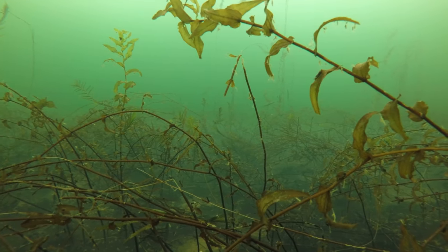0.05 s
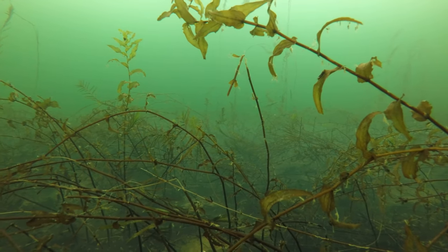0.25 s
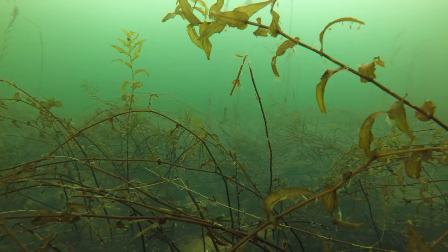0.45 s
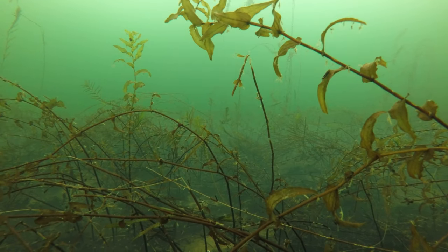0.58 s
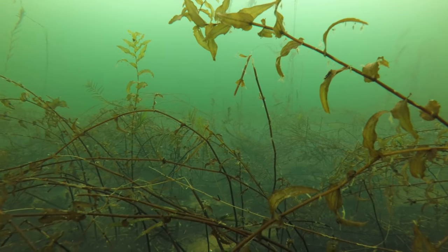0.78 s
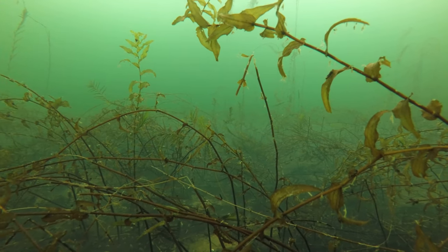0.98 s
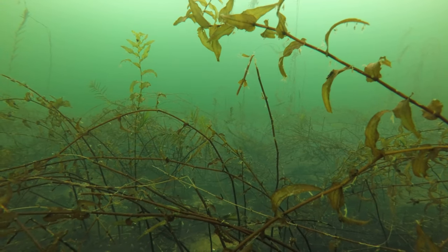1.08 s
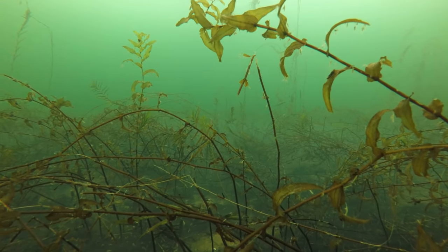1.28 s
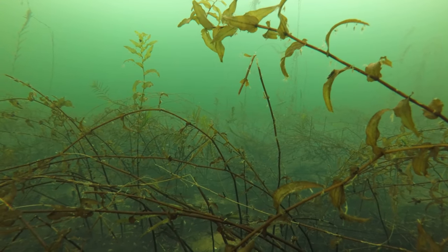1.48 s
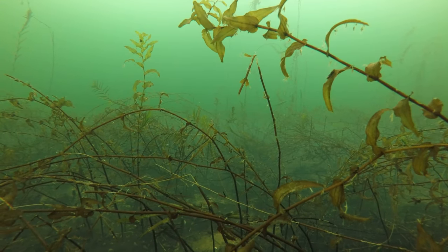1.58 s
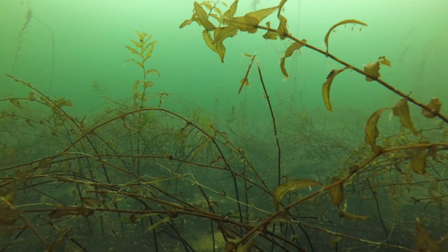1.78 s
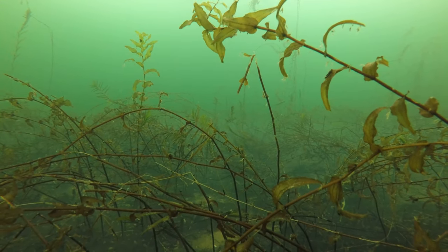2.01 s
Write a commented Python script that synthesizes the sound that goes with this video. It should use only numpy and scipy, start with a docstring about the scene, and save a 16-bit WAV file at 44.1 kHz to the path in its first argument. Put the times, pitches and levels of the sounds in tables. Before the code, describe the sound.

Crunching knocks in lake ice are heard from underwater, each a dry, splintering clack that briefly rings the microphone's housing. They start at about 0.1 seconds, with the hardest knock and a deep thud near 0.25. A dense, uneven run with a few softer thuds continues to about 1.1 seconds, then lighter, scattered clacks last until 2 seconds. Faint crackle, fizz, hiss, low rumble and hum lie beneath throughout.

```python
"""Something crunches on lake ice in a thinning run of knocks, heard from a watertight camera housing
among the weeds below. Each knock is a dry, splintering clack that briefly rings the housing, its bass
a little late; some of the heavier ones flex the sheet into a deep thud. Faint crackle and fizz, low
rumble, hum and hiss lie beneath, and a limiter ducks the hardest knock."""
import sys
import numpy as np
from scipy.fft import rfft, irfft, next_fast_len
from scipy.io import wavfile
from scipy.ndimage import uniform_filter1d, minimum_filter1d

SR = 44100
rng = np.random.default_rng(int(sys.argv[2]) if len(sys.argv) > 2 else 0)


def store_pcm(level_fs):
    """Save levels as 16-bit WAV."""
    pcm = np.round(np.clip(level_fs, -1, 1) * 32767).astype(np.int16)
    wavfile.write(sys.argv[1], SR, np.atleast_2d(pcm).T)


N = 90404
TIME = np.arange(N) / SR
FFT_SIZE = next_fast_len(N + SR // 2)
FREQS = np.maximum(np.arange(FFT_SIZE // 2 + 1) * SR / FFT_SIZE, 1)


def from_db(db):
    """Decibels to gain."""
    return 10 ** (np.asarray(db) / 20)


def unit_rms(x):
    """Scale to unit power."""
    return x / np.sqrt(np.mean(x ** 2) + 1e-20)


def fader(points):
    """Gain over time along (time_s, level_db) points."""
    return from_db(np.interp(TIME, *np.transpose(points)))


def pan(right_db):
    """Stereo gains with the right side louder by right_db."""
    return from_db(right_db * np.array([[-.5], [.5]]))


def eq(points, hz=FREQS):
    """Gain of an EQ curve through (freq_hz, gain_db) points."""
    points_hz, db = np.transpose(points)
    return from_db(np.interp(np.log(hz), np.log(points_hz), db))


def lowpass(cutoff_hz, order=6):
    """Response of a steep, smooth treble roll-off."""
    return 1 / np.sqrt(1 + (FREQS / cutoff_hz) ** (2 * order))


def resonance(hz, width_hz):
    """Response of one damped mode, 1 at its peak."""
    return 1 / (1 + 1j * (FREQS ** 2 - hz ** 2) / (FREQS * width_hz))


def filtered(x, response):
    """Pass a sound through a frequency response."""
    return irfft(rfft(x, FFT_SIZE) * response, FFT_SIZE)[..., :N]


def stereo_noise(colour, correlation=0.067):
    """Wide, coloured noise at unit power."""
    white = rng.standard_normal((3, N))
    wide = np.sqrt(1 - correlation) * white[:2] + np.sqrt(correlation) * white[2]
    return unit_rms(filtered(wide, eq(colour)))


def rumble_and_hum(rumble_db=-48.5, hum_width_hz=11.3):
    """The water's low rumble and a wavering hum of narrow noise bands swell together."""
    # tones of the hum: pitch_hz, level_db
    hum_tones = [(147, -65), (173, -58)]
    # EQ of the water's rumble: freq_hz, gain_db
    colour = [(20, -19), (50, -19.5), (108, -47), (126, -24), (145, 2.5), (190, -0.5), (240, 2.5),
              (350, -4.5), (600, -3), (1200, -1), (2500, -42)]
    # fader ride on both: time_s, gain_db
    swell = [(0, -2.5), (.3, 3), (.7, -3), (.85, 2), (1.1, 1), (1.45, 0.5), (1.58, -3), (1.73, 2.5),
             (1.81, -3.5), (1.87, 1), (1.95, -2.5), (2.05, -2.5)]
    hum = np.zeros((2, N))
    for hz, db in hum_tones:
        band = filtered(rng.standard_normal((2, N)), resonance(hz, hum_width_hz) ** 2)
        hum += from_db(db) * unit_rms(band)
    rumble = from_db(rumble_db) * stereo_noise(colour)
    return (rumble + hum) * fader(swell)


def hiss(level_db=-55.5):
    """A near-steady bed of hiss that sinks after the hardest knock and surges back."""
    # EQ of the hiss: freq_hz, gain_db
    colour = [(300, -4.5), (2000, 11), (3300, -1.5), (4800, -3.5), (6200, 0.5), (8000, -3), (10200, -3),
              (12000, -11), (13700, -16), (14900, -31)]
    # fader ride on the hiss: time_s, gain_db
    ride = [(0, 1.5), (.225, 1.5), (.245, -2), (.3, -4), (.34, 0.5), (.5, -0.5), (1.2, 1), (2.05, 0.5)]
    return from_db(level_db) * stereo_noise(colour) * pan(right_db=2) * fader(ride)


def crackle(ticks_per_s=350, spread_db=1.5, wash_db=1):
    """Many small distant ticks merge into a wash."""
    # fader ride on the crackle: time_s, level_db
    ride = [(0, -20.5), (.2, -19.5), (.35, -16.5), (.75, -19), (1.1, -20), (1.45, -20), (1.7, -20),
            (2.05, -22.5)]
    # EQ of the crackle: freq_hz, gain_db
    colour = [(200, -4.5), (400, 2), (700, -6), (1000, -2.5), (1400, 1.5), (1900, 6.5), (2400, 5.5),
              (3300, 9.5), (8000, 0)]
    onsets = rng.random(N) < ticks_per_s / SR
    accents_db = spread_db * np.minimum(rng.exponential(1, N), 4)
    ticks = unit_rms(onsets * from_db(accents_db) * rng.choice([-1, 1], N))
    wash = from_db(wash_db) * rng.standard_normal(N)
    return filtered(unit_rms(ticks + wash) * fader(ride), eq(colour))


def fizz():
    """A fine, bright sizzle, strongest while the knocks are busiest."""
    # fader ride on the fizz: time_s, level_db
    ride = [(0, -67), (.29, -65), (.35, -60), (.45, -65), (.62, -71), (.72, -63), (.95, -64), (1.2, -78),
            (2.05, -83)]
    # EQ of the fizz: freq_hz, gain_db
    colour = [(1500, -20), (3200, -6), (6000, -4), (8000, -11), (12000, -25)]
    return stereo_noise(colour) * fader(ride)


def knocks(echo_db=-7.5, echo_t60_s=0.066, echo_rise_s=0.001, trim_db=-0.24):
    """Blunt, splintering clicks in the ice, trailing echoes scattered between sheet and lake bed."""
    # knocks in the ice: start_s, level_db, bass_db, treble_db
    hits = [(0.0787, 16.5, -6, 9.5), (0.083, 29.5, -2.5, -11), (0.0897, 10.5, -3, 6),
            (0.1199, 17.5, -2, -1), (0.1255, 17.5, 5, -13), (0.1325, 15, 4.5, -8), (0.2216, 29, -7, -25),
            (0.2327, 40.5, -23, -15.5), (0.237, 35, -23, -17), (0.2467, 21, 9, -8), (0.267, 20.5, 5.5, -9),
            (0.2805, 18, -3, -6), (0.2869, 13.5, 12, 5.5), (0.3085, 27.5, -0.5, -24),
            (0.3253, 24.5, -25, -4.5), (0.3351, 21, 0.5, -32), (0.3441, 23, -6, 1), (0.3688, 21.5, -22, 3),
            (0.3993, 28.5, 6, -35), (0.4202, 25, -19.5, -4), (0.4526, 19, -3, 3.5), (0.467, 31, -3, -32),
            (0.487, 28, 1, -7.5), (0.4898, 13, 3, 7), (0.4993, 22, -2, -5), (0.5329, 27, 0.5, -11),
            (0.536, 17.5, -7, 4.5), (0.5515, 21, -9, -1), (0.568, 27.5, -2, -12), (0.573, 20, -20, 2),
            (0.5773, 12, -11, 11.5), (0.5987, 18, -3, -10), (0.605, 16, -5, -17), (0.6134, 27.5, -1, -9),
            (0.6415, 29, 2, -23), (0.6662, 29.5, 2, -7.5), (0.6977, 16.5, -2, -14), (0.711, 15, 1, 8.5),
            (0.7187, 28.5, -1.5, -4.5), (0.723, 18, 6, -1), (0.735, 24.5, -4, -14), (0.742, 17, -17, -1),
            (0.787, 12, 0, 12), (0.792, 30, -11, -12), (0.7965, 17, 4, -2), (0.806, 11, 10, -13),
            (0.8165, 21.5, 3, -8), (0.848, 19.5, 1.5, -2), (0.8796, 4, 12, 4), (0.899, 23.5, -30, -2.5),
            (0.916, 27.5, -5.5, -10.5), (0.929, 16, 3, -1), (0.9512, 24.5, -6, -10), (0.985, -1, -8, 13),
            (0.9937, 15.5, -7, -8), (1.0098, 8.5, -29, 4), (1.0537, 14, -9, -16), (1.0647, 25, 2, -8.5),
            (1.069, 12, 8, 2), (1.084, 10, 9, 11), (1.086, 10.5, 6, 5), (1.0987, 24.5, 0, -9),
            (1.102, 20.5, -1, -6), (1.1612, 22, -16, 2.5), (1.183, 15.5, 0.5, 2), (1.256, 20, -7, 2),
            (1.25704, 17, -7, 2), (1.3377, 22.5, -8, -2), (1.3405, 18, 1.5, -1), (1.3846, 19, 0.5, -0.5),
            (1.3906, 20, -20, -4), (1.4047, 6.5, -9.0, 17.5), (1.409, 6.5, 3, 17.5), (1.417, 15, 3, 2.5),
            (1.4689, 6.5, 3, 12.5), (1.557, 11, -21, 8.5), (1.6081, 10.5, -23, 0.5), (1.636, 18.5, 1.5, -4),
            (1.63775, 16, 2, -4), (1.6416, 22.5, -5.5, -9.5), (1.7518, 17, -13, 10.5),
            (1.7532, 14.5, -4, -4), (1.766, 19.5, -15, 0), (1.953, 8.5, -26, 14.5), (1.957, 6.5, -14, 10)]
    size, preroll = 8192, 1024   # samples
    hz = np.maximum(np.arange(size // 2 + 1) * SR / size, 1)
    t = np.maximum(np.arange(size) - preroll, 0) / SR
    tail = np.exp(-np.log(1000) * t / echo_t60_s) * (1 - np.exp(-t / echo_rise_s))
    tail *= from_db(echo_db) / np.sqrt(np.sum(tail ** 2))
    out = np.zeros(N + 2 * size)
    for start_s, level_db, bass_db, treble_db in hits:
        click = tail * rng.standard_normal(size)
        click[preroll] += 1   # the direct hit, ahead of its echoes
        tone = eq([(523, bass_db), (910, 0), (1113, 0), (1520, treble_db), (4030, treble_db + 2.5)], hz)
        cracks = from_db(0.21 * treble_db) * splinters(hz, preroll / SR)   # brighter knocks splinter more
        spectrum = (rfft(click) * tone + cracks) * bass_lag(hz, bin_hz=SR / size)
        start = int(start_s * SR)
        out[start:start + size] += from_db(level_db + trim_db) * irfft(spectrum, size)
    return out[preroll:preroll + N]


def splinters(hz, knock_s, count=4, gap_s=0.002465, span_s=0.008, level_db=-11.5, fade_db=20):
    """Spectrum of the uneven, fading run of tiny after-cracks behind a knock."""
    # EQ of the after-cracks: freq_hz, gain_db
    colour = [(300, -2.5), (900, -2.5), (1600, 7), (2200, 4.5), (3500, 12.5), (5000, 13)]
    progress = (np.arange(count) + rng.random(count)) / count
    strengths = rng.choice([-1, 1], count) * from_db(level_db - fade_db * progress)
    times_s = knock_s + gap_s + span_s * progress
    impulses = np.exp(-2j * np.pi * np.outer(times_s, hz))
    return strengths @ impulses * eq(colour, hz)


def bass_lag(hz, bin_hz, lag_s=0.00464, typical_knee_hz=494.6):
    """All-pass response: the bass arrives late, below a knee that varies from knock to knock."""
    knee_hz = typical_knee_hz * np.exp(0.17 * rng.uniform(-1.1, 1))
    delay_s = lag_s / (1 + (hz / knee_hz) ** 3)
    return np.exp(-2j * np.pi * np.cumsum(delay_s) * bin_hz)


def thuds(rise_s=0.0031, low_cut_hz=175):
    """Under heavier knocks the sheet flexes for a few low cycles that swell and die."""
    # flexes of the ice sheet: start_s, pitch_hz, level_db
    flexes = [(0.2393, 337, -23), (0.253, 266, -33.5), (0.286, 338, -31), (0.314, 326, -36),
              (0.403, 370, -35.5), (0.793, 329, -28.5), (0.800, 253, -39), (0.822, 276, -36.5),
              (0.845, 200, -39), (0.921, 321, -38.5), (1.067, 327, -37)]
    out = np.zeros(N)
    for start_s, pitch_hz, level_db in flexes:
        t = np.maximum(TIME - start_s, 0)
        envelope = t / rise_s * np.exp(1 - t / rise_s)
        out += from_db(level_db) * envelope * np.sin(2 * np.pi * pitch_hz * t)
    return filtered(out * pan(right_db=2), 1 - lowpass(low_cut_hz))


def housing(x):
    """The case rings in its modes; each reaches the two microphones with its own strength and sign."""
    # modes of the housing: pitch_hz, width_hz, left_gain, right_gain
    modes = [(390, 122, 0.069, -0.0079), (481, 55, -0.097, 0.21), (603, 64, 0.25, 0.077),
             (771.5, 127.5, 0.081, 0.34), (855, 119, 0.32, -0.23), (917, 78.7, 0.64, -0.053),
             (1102, 222, -0.54, 0.79), (1249, 36, 0.15, -0.54), (1496, 197, -0.06, 0.12),
             (1620, 120, 0.15, -0.027), (1758, 641, 0.0036, -0.2634), (1840, 96, 0.085, -0.094),
             (2340, 1450, -0.0252, 0.039), (2624, 210, 0.0095, -0.0314), (2550, 230, -0.0167, 0.021),
             (2840, 470, 0.0234, -0.015)]
    # EQ of the path through water and wall: freq_hz, gain_db
    wall = [(60, -9), (120, -13), (250, -1.5), (500, 1.5), (1000, 0.4), (2000, 2.1), (2550, 0.5),
            (3300, -1.5), (4500, 0), (8000, -7), (14000, -49)]
    ring = sum(resonance(hz, width_hz) * np.array([[left], [right]]) for hz, width_hz, left, right in modes)
    return filtered(x, ring * eq(wall))


def scene():
    """Knocks and crackle ring the housing; thuds and the noise beds are mixed in directly."""
    blows = filtered(knocks(), lowpass(cutoff_hz=3340))   # a soft contact dulls the top
    return housing(blows + crackle()) + thuds() + rumble_and_hum() + hiss() + fizz()


def record(dry):
    """A fast look-ahead limiter with a slow release, then a brick-wall cut of the top."""
    threshold_db, release_db_per_s, window_s = -4, 52, 0.00076
    window = int(window_s * SR)
    peak_db = 20 * np.log10(np.abs(dry).max(axis=0) + 1e-9)
    over_db = np.maximum(peak_db - threshold_db, 0)
    release_db = release_db_per_s * TIME
    reduction_db = np.maximum.accumulate(over_db + release_db) - release_db
    gain_db = uniform_filter1d(minimum_filter1d(-reduction_db, window), window)
    return filtered(dry * from_db(gain_db), lowpass(cutoff_hz=14800, order=80))


dry = scene()
out = record(dry)
store_pcm(out)
```